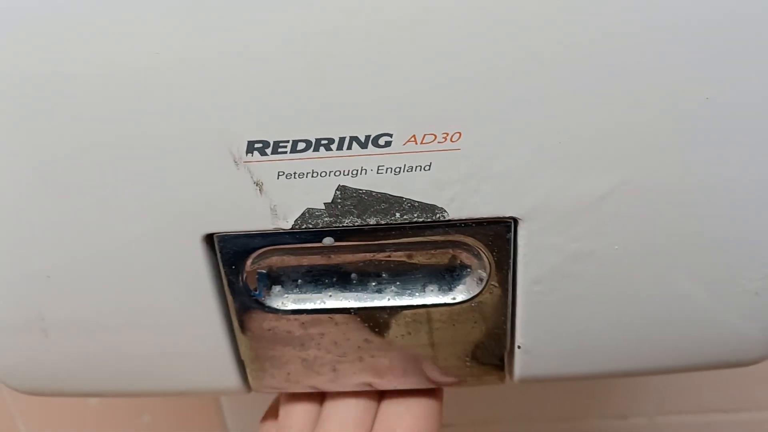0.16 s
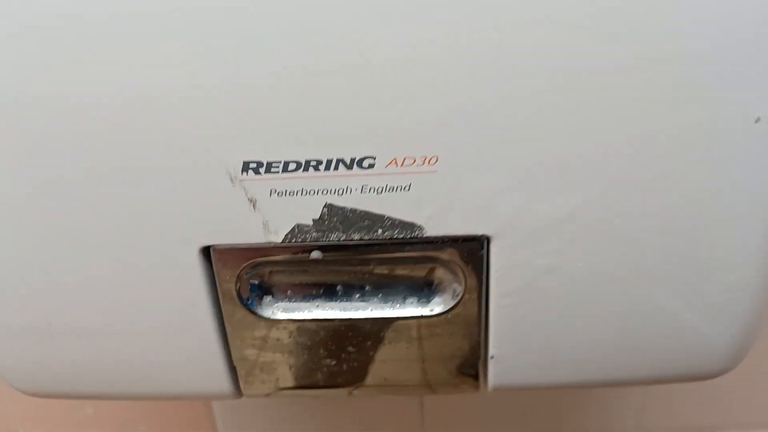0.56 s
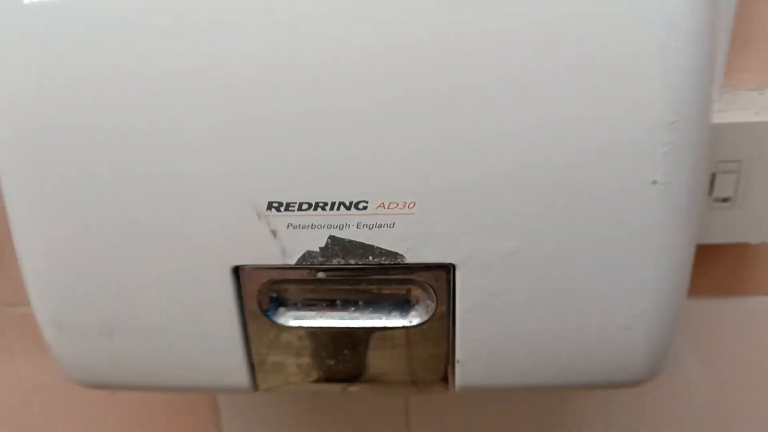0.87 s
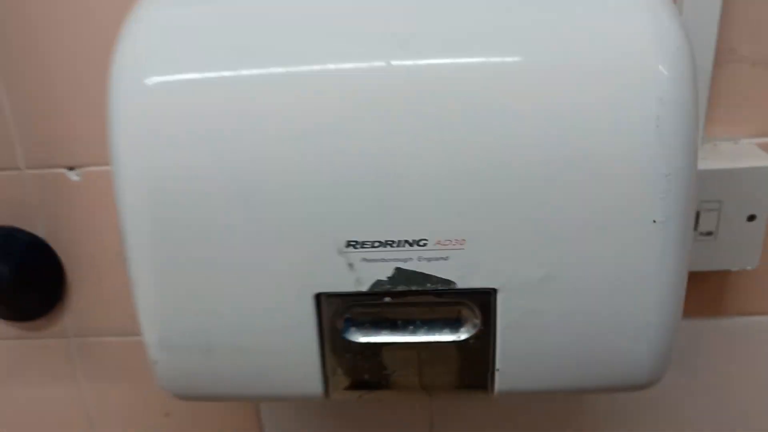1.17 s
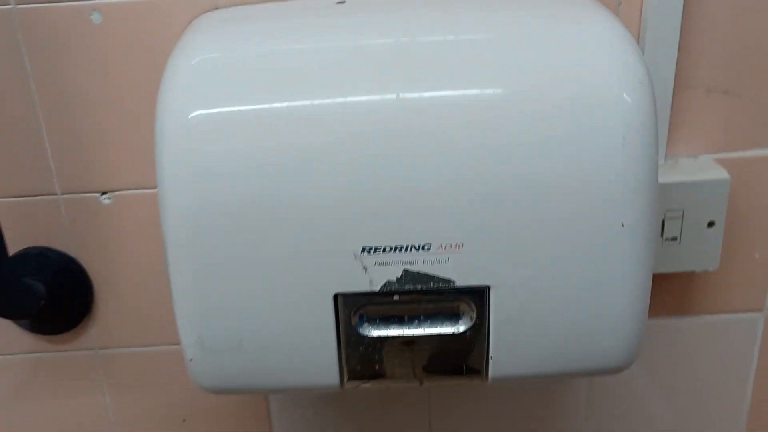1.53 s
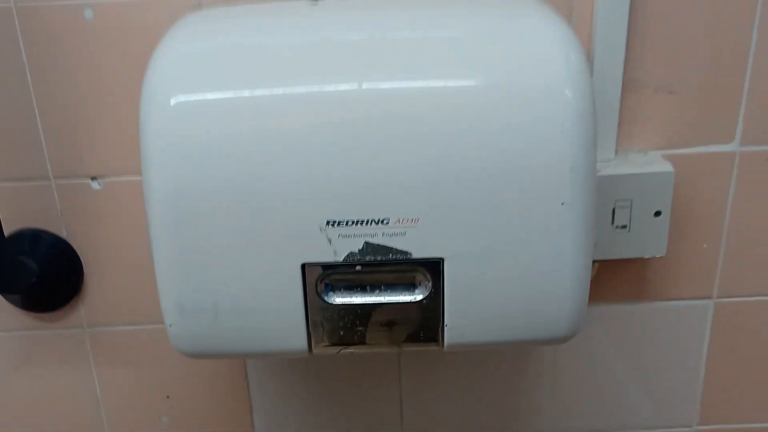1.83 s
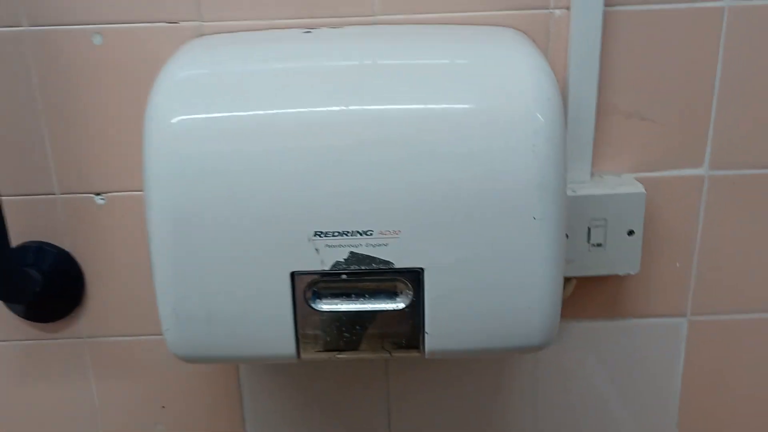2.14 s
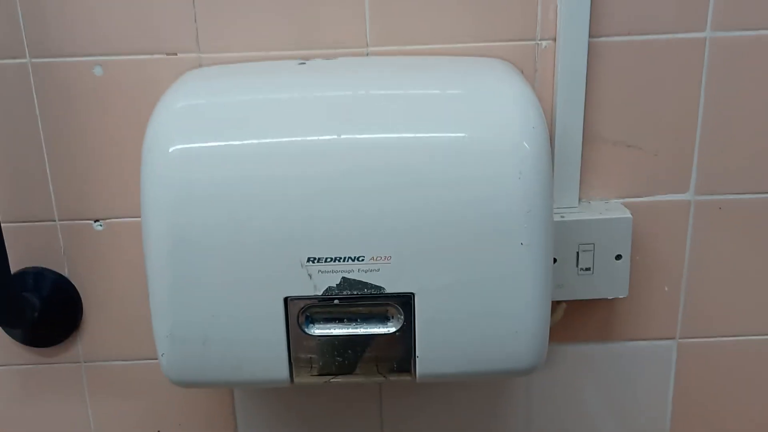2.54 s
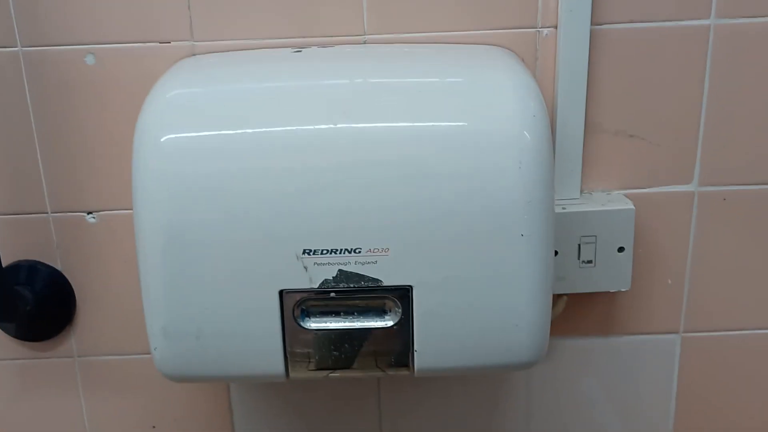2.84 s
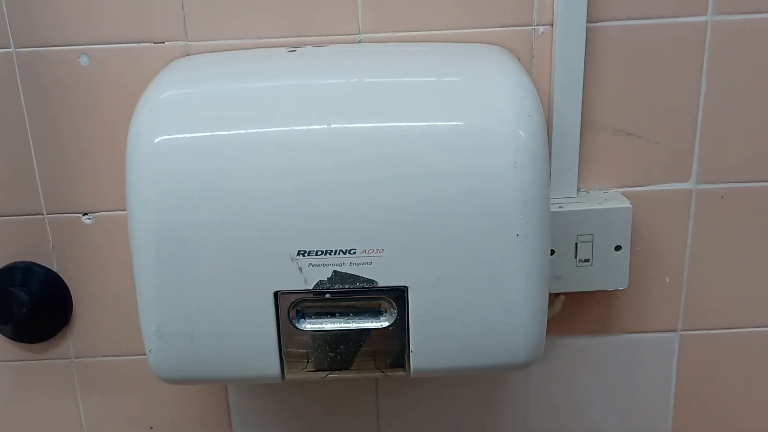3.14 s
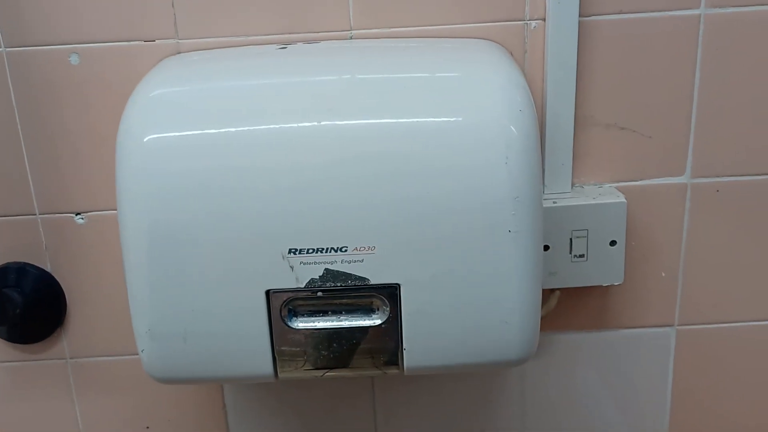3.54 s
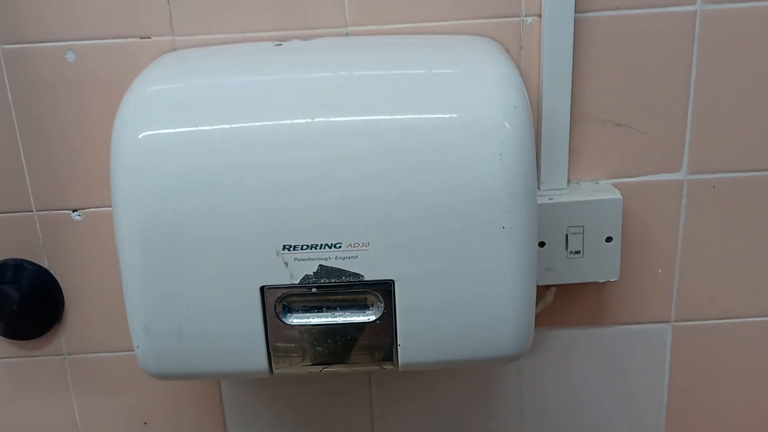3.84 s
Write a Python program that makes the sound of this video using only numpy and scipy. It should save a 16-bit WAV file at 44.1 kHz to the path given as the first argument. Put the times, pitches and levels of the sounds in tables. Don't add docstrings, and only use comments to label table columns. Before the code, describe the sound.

Hand dryer blowing loud rushing air, a sharp pop midway, then winding down to faint hiss.

```python
import sys
import numpy as np
from scipy import signal
from scipy.fft import rfft, irfft, next_fast_len
from scipy.io import wavfile
from scipy.ndimage import uniform_filter1d, map_coordinates

SR = 44100
rng = np.random.default_rng(int(sys.argv[2]) if len(sys.argv) > 2 else 0)


def bounce(signal):
    frames = np.transpose(np.atleast_2d(signal))
    limited = np.clip(frames, -1, 1)
    pcm = np.round(limited * 32767).astype(np.int16)
    wavfile.write(sys.argv[1], SR, pcm)


def field_ratio(decibels):
    return 10 ** (np.asarray(decibels, dtype=float) / 20)


N = 176400


def unit(x):
    return x / np.sqrt(np.mean(x ** 2) + 1e-20)


def along(points, hz):
    f, value = np.transpose(points)
    return np.interp(np.log(hz + 1), np.log(f + 1), value)


def curves(rows, t):
    seconds, *columns = np.transpose(rows)
    return [np.interp(t, seconds, column) for column in columns]


def filtered(x, response):
    size = next_fast_len(N + SR // 2)
    hz = np.fft.rfftfreq(size, 1 / SR)
    return irfft(rfft(x, size) * response(hz), size)[..., :N]


def shaped(x, field_db):
    hz, t, z = signal.stft(x, SR, nperseg=512)
    z = z * field_ratio(field_db(hz[:, None], t))
    return signal.istft(z, SR, nperseg=512)[1][..., :N]


def resonant(peaks):
    def response(hz):
        humps = (field_ratio(db) ** 2 / (1 + (2 * (hz - centre) / width) ** 2) ** 2 for centre, width, db in peaks)
        return np.sqrt(1 + sum(humps))
    return response


def bell(x, centre, width):
    return np.exp(-.5 * ((x - centre) / width) ** 2)


def hump(hz, centre, octaves):
    return bell(np.log2((hz + 1) / centre), 0, octaves)


def step(hz, edge, octaves):
    return .5 + .5 * np.tanh(np.log2((hz + 1) / edge) / octaves)


# frequency in Hz, correlation as a share.
PORT_LIKENESS = [(60, 0.71), (130, 0.98), (290, 0.88), (640, 0.66), (1400, 0.31), (3000, 0.22), (6000, .01)]
# frequency in Hz, lead of the left in radians.
LEFT_LEAD = [(100, .02), (600, 0.23), (1100, 2.08), (1800, 3.84), (3700, 7.63)]


def rush(spectrum, patchy_db):
    def patches(hz, t):
        gust = map_coordinates(rng.standard_normal(400), [t * 12]) * hz / (hz + 1500)
        field = rng.standard_normal((len(hz), len(t)))
        field = uniform_filter1d(field, size=9, axis=0)
        field = uniform_filter1d(field, size=9, axis=1)
        return 0.7 * gust + patchy_db * unit(field)

    def mid_side(hz):
        turn = np.arccos(np.clip(along(PORT_LIKENESS, hz), 0, 1)) / 2
        return field_ratio(along(spectrum, hz)) * [np.cos(turn), np.sin(turn)]

    def phase_lead(hz):
        return np.exp(.5j * along(LEFT_LEAD, hz) * np.array([[1], [-1]]))

    pair = shaped(rng.standard_normal((2, N)), patches)
    mid, side = filtered(pair, mid_side)
    return filtered(np.array([mid + side, mid - side]), phase_lead)


# time in seconds, level in dB.
JET_LEVEL = [(0, -19.5), (.15, -19.5), (.35, -19), (.7, -20), (.95, -18), (1.2, -19.5), (1.6, -18.5),
             (1.9, -19), (2.2, -18.5), (2.42, -20), (2.55, -24.5), (2.7, -29), (2.79, -34), (2.95, -39),
             (3.1, -44.5), (3.4, -49), (3.7, -49.5), (4, -46.5)]
# frequency in Hz, density in dB per Hz.
JET_SPECTRUM = [(25, -66), (60, -37), (120, -15.5), (220, -7), (500, -10.5), (1200, -10), (4000, -17.5),
                (9000, -47.5)]
# frequency in Hz, width in Hz, level close in dB, level further back in dB.
ROOM_MODES = [(74, 7, -3, 8.5), (134.9, 6.7, 6, 8.5), (175.7, 3.9, 12.5, 16), (211.4, 13.6, 10.5, 9),
              (225.8, 5.4, 5, 13.5), (268, 21.4, 8.5, 10), (318.8, 4.2, 9.5, 0.5), (352, 20, 1.5, 8),
              (432, 10.6, 10.5, 6.5), (480.3, 12, 3.5, 7), (607.4, 14, 5.5, -12), (735, 22, -2, 2.5),
              (858, 6.9, 5.5, 8.5), (1098, 12.7, -3, 9)]


def jet():
    back_start_s, back_end_s = 0.77, 1.8
    near_bass_db, near_bass_hz = 6.5, 138
    t = np.arange(N) / SR
    air = rush(JET_SPECTRUM, patchy_db=0.62)
    hz, width, near_db, far_db = np.transpose(ROOM_MODES)
    near_modes = resonant(list(zip(hz, width, near_db)))
    far_modes = resonant(list(zip(hz, width, far_db)))
    near = filtered(air, lambda f: near_modes(f) * field_ratio(near_bass_db / (1 + (f / near_bass_hz) ** 4)))
    far = filtered(air, far_modes)
    back = np.clip((t - back_start_s) / (back_end_s - back_start_s), 0, 1)
    return field_ratio(curves(JET_LEVEL, t)[0]) * unit((1 - back) * near + back * far)


# time in seconds, level in dB.
ROTOR_LEVEL = [(0, -28), (1, -28), (2.4, -28.5), (2.6, -32), (2.85, -34.5), (3.2, -36.5), (3.4, -41.5),
               (3.65, -42.5), (4, -46)]
# frequency in Hz, density in dB per Hz.
ROTOR_SPECTRUM = [(25, -46), (100, -15), (260, -6.5), (800, -18.5), (2500, -14), (6000, -14.5),
                  (10000, -10), (16000, -15)]
# frequency in Hz, share of the level fall followed.
SLOWING_SHARE = [(100, 0.78), (1000, 0.49), (5000, 1.26), (9000, 1.22), (14000, 1.87)]
# frequency in Hz, width in Hz, level in dB.
CASING_MODES = [(215, 12, 9), (261, 9, 12), (447, 12, 9.5), (485, 16, 9.5), (830, 100, 10.5), (1040, 29, 6),
                (1150, 30, 7), (1265, 60, 10.5), (1700, 67, 3), (1980, 75, 6), (3310, 200, 2)]


def rotor():
    modes = resonant(CASING_MODES)
    hiss = rush(ROTOR_SPECTRUM, patchy_db=0.5)
    whirr = unit(filtered(hiss, lambda hz: modes(hz) * field_ratio(-6 * bell(hz, 580, 55))))
    full_db = ROTOR_LEVEL[0][1]

    def slowing(hz, t):
        return (curves(ROTOR_LEVEL, t)[0] - full_db) * along(SLOWING_SHARE, hz)
    return field_ratio(full_db) * shaped(whirr, slowing)


# middle in seconds, half length in seconds, frequency
# in Hz, level in dB.
MODE_SWELLS = [(0.32, 0.34, 183, -24), (0.1, .09, 410, -33), (.4, .14, 413, -34), (.3, .2, 485, -38),
               (.75, .12, 428, -35), (.8, .12, 223, -30), (.6, .12, 258, -31), (.4, .2, 725, -36),
               (1.07, .08, 181, -35), (1.1, .2, 133, -40), (1.1, .1, 360, -34), (1.2, .15, 228, -32),
               (1.25, .1, 1114, -39), (1.636, 0.21, 265, -30), (1.889, 0.074, 225, -22.5),
               (2.4, 0.2, 273, -33), (2.5, .1, 330, -39), (2.667, 0.06, 212, -32), (2.64, .08, 274, -35),
               (2.92, .16, 266, -39), (2.98, 0.05, 212, -43), (3.26, 0.09, 260, -44), (3.7, 0.24, 261, -44),
               (3.06, 0.47, 73, -69), (3.87, .12, 447, -55), (3.55, .15, 855, -58), (3.0, .2, 795, -56),
               (.4, .3, 860, -37), (3.8, .15, 805, -59), (3.1, .12, 1990, -56)]


def hum():
    drift_rad, knots_per_s = .7, 12
    t = np.arange(N) / SR
    out = np.zeros(N)
    for middle, half, hz, db in MODE_SWELLS:
        drift = drift_rad * map_coordinates(rng.standard_normal(64), [t * knots_per_s])
        note = np.sin(2 * np.pi * hz * t + drift)
        out += np.sqrt(2) * field_ratio(db) * bell(t, middle, half) * note
    return out


# frequency in Hz, width in Hz, level in dB.
MODE_HOLLOWS = [(402, 29.6, -5.5), (554, 49, -6), (920, 43, -3.5), (1305, 170, -0.5), (178, 7, -2)]


def tiles(sound):
    ripple_db, ripple_hz, from_hz, to_hz = 4, 14, 317, 3980
    knots = rng.standard_normal((2, 4000))

    def response(hz):
        place = np.minimum(hz / ripple_hz, 3900)
        ripple = np.array([map_coordinates(k, [place]) for k in knots])
        reach = hz ** 2 / (hz ** 2 + from_hz ** 2) / (1 + hz / to_hz)
        hollows = sum(db * bell(hz, centre, width) for centre, width, db in MODE_HOLLOWS)
        return field_ratio(ripple_db * ripple * reach + hollows)
    return filtered(sound, response)


# frequency in Hz, gain in dB.
LEFT_OPEN = [(600, 1.5), (1500, -3), (2500, -9), (4000, -7.5), (6500, 1.5), (8000, -5), (10500, -12.5),
             (13500, -3.5)]
# time in seconds, covered share, cavity in Hz, cavity gain in dB.
PALM_COVER = [
    (0, 0, 2440, 14),
    (.74, 0, 2310, 35),
    (.89, 0.43, 2530, 16),
    (.97, 0.91, 3100, 14.5),
    (1.15, 0.96, 2690, 16),
    (1.3, 0.94, 2400, 13),
    (1.6, 0.93, 2080, 11.5),
    (2.1, 0.9, 1885, 11.5),
    (4, 1, 1870, 6),
]
# frequency in Hz, gain in dB.
PALM_TONE = [(550, -2), (1300, 3), (1900, 1), (2600, 6), (3750, -3), (6900, 1), (9600, 7), (11300, -4)]


def cupped_port(sound):
    def gain_db(hz, t):
        share, cavity_hz, cavity_db = curves(PALM_COVER, t)
        loose = np.clip(np.log2(cavity_hz / 1870), 0, 1)
        wide = 1 + 0.86 * loose
        cavity = cavity_db * hump(hz, cavity_hz, 0.2 * wide) - step(hz, cavity_hz, 0.2)
        overtone = 15.5 * hump(hz, 5600 * 2 ** (0.045 * loose), 0.14 * np.sqrt(wide))
        ridge = 10.5 * hump(hz, 13660, 0.091)
        leak = loose * (5.5 * hump(hz, 4160, 0.23) + 10 * hump(hz, 11400, 0.1))
        return along(LEFT_OPEN, hz) + share * (along(PALM_TONE, hz) + cavity + overtone + ridge + leak)
    return shaped(sound, gain_db)


# frequency in Hz, gain in dB.
RIGHT_OPEN = [(600, 3), (2000, -4.5), (4000, -0.5), (6600, 6.5), (7700, -12.5), (10000, -9), (12800, -4.5),
              (15600, -6)]
# time in seconds, covered share, shadow edge in Hz.
FINGER_COVER = [
    (0, 0.11, 7300),
    (.9, 0.1, 7300),
    (1.05, .15, 7300),
    (1.36, 0.28, 6600),
    (1.43, .9, 5200),
    (1.5, 1, 3900),
    (1.9, 1, 4260),
    (2.2, 1, 5330),
    (2.9, 1, 4800),
    (4, 1, 5100),
]
# frequency in Hz, gain in dB.
FINGER_TONE = [(550, -1), (1000, -1), (1700, -4), (2600, 1), (4200, 1), (7000, -12), (9500, 1), (13500, 1)]


def fingered_port(sound):
    def gain_db(hz, t):
        share, edge_hz = curves(FINGER_COVER, t)
        shadow = -9 * step(hz, edge_hz, .12)
        return along(RIGHT_OPEN, hz) + share * (along(FINGER_TONE, hz) + shadow)
    return shaped(sound, gain_db)


def pop():
    pop_s, width_s, rebound_s = 1.3768, .00011, .0006
    t = np.arange(N) / SR - pop_s
    after = np.maximum(t - 2 * width_s, 0)
    rise = 1 - np.exp(-after / (.3 * width_s))
    rebound = .55 * rise * (1 - after / (3 * rebound_s)) * np.exp(-after / rebound_s)
    pulse = field_ratio(-.6) * (rebound - bell(t, 0, width_s))
    tick = -field_ratio(-14) * bell(t, 0, .00025) * np.cos(2 * np.pi * 5000 * t)
    return pulse + tick


# time in seconds, level in dB, left minus right in dB.
HAND_THUMPS = [
    (.92, -60, 6),
    (1.38, -52, -14),
    (1.6, -57, -9),
    (3.549, -60.5, 8),
    (3.84, -56, -12),
]


def thumps():
    t = np.arange(N) / SR
    out = np.zeros((2, N))
    for s, db, pan_db in HAND_THUMPS:
        burst = bell(t, s, 0.034) * np.sin(2 * np.pi * 87 * (t - s))
        out += field_ratio([[db + pan_db / 2], [db - pan_db / 2]]) * burst
    return out


def scene():
    left, right = tiles(jet() + rotor()) + hum()
    heard = np.array([cupped_port(left), fingered_port(right) + pop()])
    return heard + thumps()


def low_pass(x):
    return signal.sosfilt(signal.butter(12, 15800, fs=SR, output="sos"), x)


def record(dry):
    mix = filtered(dry, lambda hz: 1 / (1 + (hz / 15700) ** 80))
    return low_pass(mix)


dry = scene()
out = record(dry)
bounce(out)
```